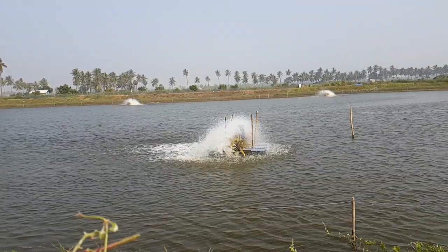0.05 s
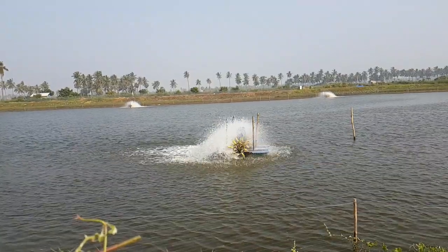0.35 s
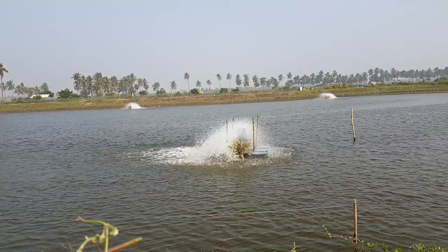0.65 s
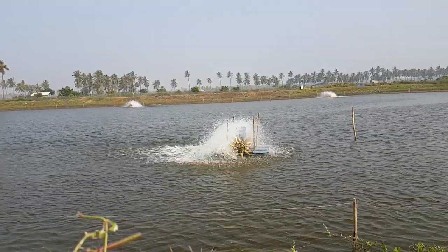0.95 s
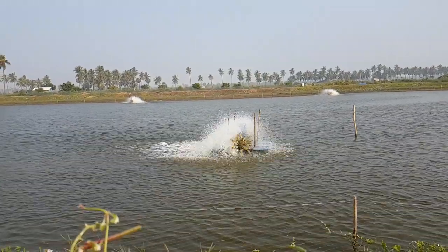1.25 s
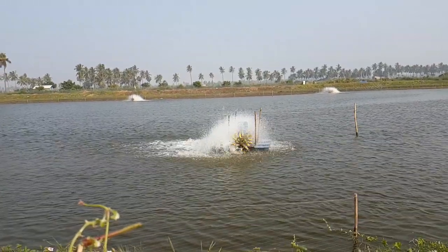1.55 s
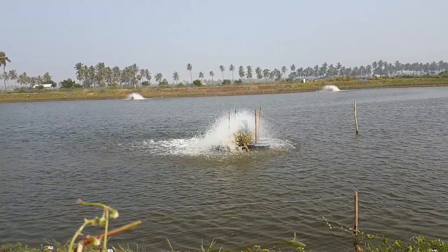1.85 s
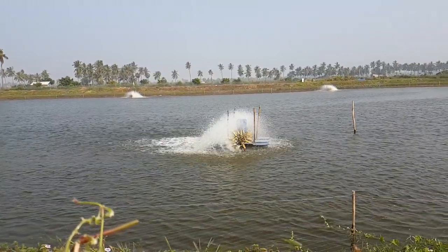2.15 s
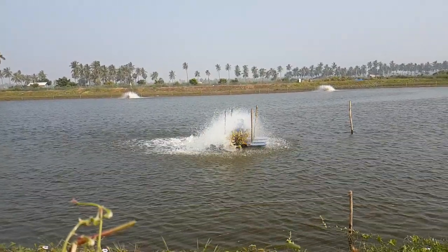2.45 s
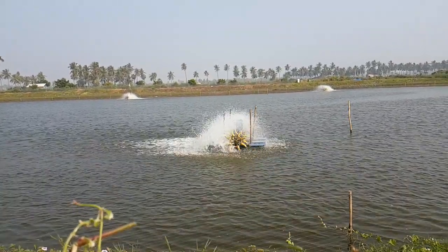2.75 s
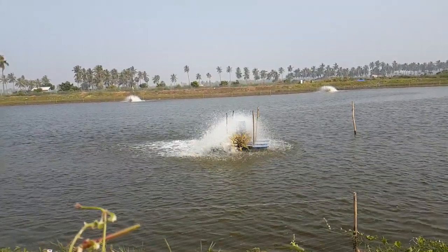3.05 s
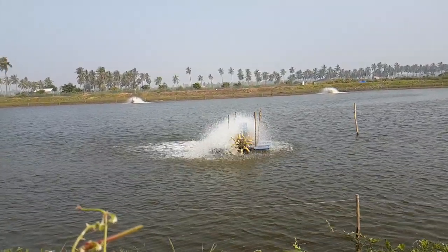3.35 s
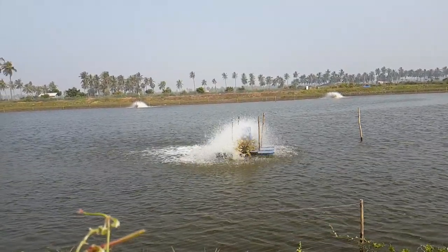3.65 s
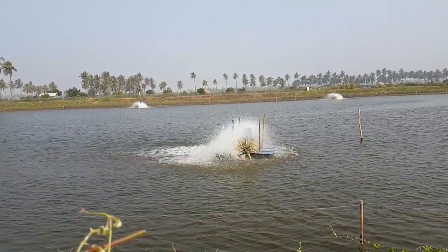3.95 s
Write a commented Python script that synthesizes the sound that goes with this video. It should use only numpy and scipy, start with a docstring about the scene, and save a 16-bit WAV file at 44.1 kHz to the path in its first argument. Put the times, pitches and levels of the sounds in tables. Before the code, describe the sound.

Steady splashing from a paddlewheel carries across an open pond, with light bubbling underneath. Gusts flutter on the microphone throughout, stronger on the right, with a few sharp air pops and then a run of low thumps.

```python
"""A paddlewheel aerator churns a pond some way off, heard from the bank through a stereo microphone.
From the start its spray falls back as a sloshing rush over small bubbles, coloured by close
reflections, while gusts rumble and flutter on the two ports, harder on the right. Half a second in,
a cluster of bubbles plinks. Air pops on a port just after that, and twice more around 1.8 s.
From 3.2 s a run of buffets thumps mostly on the right, and the rush carries on underneath."""
import sys
import numpy as np
from scipy import signal
from scipy.fft import rfft, irfft
from scipy.io import wavfile
from scipy.ndimage import uniform_filter1d

SR = 44100
rng = np.random.default_rng(int(sys.argv[2]) if len(sys.argv) > 2 else 0)


def transcribe(u):
    """Save the signal u as a 16-bit wav file named by the first command-line argument.

    u: samples, shape (n,) or (channels, n), limited to [-1, 1]; the rate is SR.
    q: integer samples, one column per channel.
    """
    v = np.clip(np.atleast_2d(u).T, -1, 1)
    q = np.round(v * 32767).astype(np.int16)
    wavfile.write(sys.argv[1], SR, q)


N = 176400
T = np.arange(N) / SR
SIZE, HOP = 1024, 128
HZ = np.fft.rfftfreq(SIZE, 1 / SR)
FRAME_S = np.arange(N // HOP + 9)[:, None] * HOP / SR

# The rise and fall of the wind. Each row: time in seconds, strength in dB.
GUST_ENVELOPE = [(0, -35.5), (.055, -26), (.08, -38), (.15, -36.5), (.26, -29.5), (.33, -34.5),
                 (.81, -34.5), (1.11, -37.5), (1.2, -40), (1.43, -32.5), (1.55, -37), (1.64, -33.5),
                 (1.81, -33.5), (1.92, -42.5), (2.08, -35), (2.14, -41), (2.26, -28.5), (2.35, -42),
                 (2.61, -32), (2.66, -42.5), (2.82, -38.5), (2.93, -36.5), (3.09, -37), (3.27, -29.5),
                 (3.39, -35), (3.56, -29), (3.63, -40.5), (3.67, -32), (3.79, -35.5), (3.92, -32.5),
                 (4, -40)]
# Tone of light air and of a buffet on a port. Each row: frequency in Hz, relative level in dB.
RUMBLE_EQ = [(20, -30), (40, -34), (65, -1.5), (120, 4), (200, -2), (330, -1.5), (480, -8.5), (700, -15.5),
             (1200, -28), (3000, -69)]
BUFFET_EQ = [(20, -41), (60, -17), (130, -6), (250, 0), (380, 2.5), (520, -5.5), (750, -14.5),
             (1200, -24.5), (3000, -57)]
# Extra body in the right port's rumble. Each row: frequency in Hz, boost over the left in dB.
RIGHT_RUMBLE_EQ = [(60, 1.5), (150, 2), (350, 6.5), (800, 3.5)]
# Wind hits. Each row: peak time and length in seconds, centre in Hz, left and right level in dB.
BUFFET_HITS = [(.044, 0.016, 320, -24, -22), (.271, 0.023, 353, -21.5, -20),
               (.573, 0.0088, 330, -42, -24.5), (.673, .022, 700, -49, -30), (0.77, .008, 390, -28, -29),
               (.8, 0.013, 340, -26, -22.5), (.826, 0.012, 350, -26.5, -23), (.908, 0.015, 350, -33.5, -30),
               (1.042, 0.013, 330, -42, -25.5), (1.24, 0.012, 340, -29, -27), (1.332, 0.029, 460, -31, -30),
               (1.394, 0.034, 690, -41, -31), (1.518, 0.0044, 390, -21, -26), (1.671, .034, 320, -40, -27),
               (1.73, 0.021, 366, -32, -23), (1.798, 0.02, 460, -21.5, -26), (1.822, .013, 400, -22, -23.5),
               (2.098, 0.016, 350, -32.5, -22.5), (2.428, 0.039, 400, -29, -26.5),
               (2.479, 0.032, 380, -23, -24), (2.586, 0.021, 380, -24, -36),
               (2.757, 0.0059, 680, -40, -29.5), (2.91, .014, 250, -31, -29.5),
               (3.185, 0.0084, 400, -23, -19), (3.219, 0.0091, 382, -34, -19.5),
               (3.253, 0.027, 384, -27.5, -18), (3.346, 0.012, 316, -31, -19),
               (3.371, 0.012, 298, -31, -22), (3.43, .008, 350, -25.5, -24.5), (3.514, .025, 390, -28, -26),
               (3.595, .013, 330, -27.5, -22), (3.692, .01, 520, -36, -28), (3.71, 0.0094, 340, -33, -19.5),
               (3.897, 0.016, 300, -30.5, -27)]
# Sharp pops of air. Each row: time in seconds, port (0 left, 1 right), peak in dB.
AIR_POPS = [(.572, 1, -19), (1.792, 0, -11), (1.824, 1, -16)]
# Reflections off surfaces close to each port. Each row: delay in milliseconds, linear gain.
REFLECTIONS_LEFT = [(.347, .27), (.528, -.22), (2.222, .14)]
REFLECTIONS_RIGHT = [(.197, .68), (.829, -.2), (1.22, -.38), (1.594, .22), (1.758, -.46), (1.93, .22),
                     (2.463, -.31), (2.979, -.44), (3.102, -.17), (3.386, -.16), (3.678, .19)]
# Scattered sound that widens the spray. Each row: frequency in Hz, level over the direct sound in dB.
SCATTER_EQ = [(400, 13), (950, 2), (1500, -10.5), (2600, 2), (4500, 2), (7000, 1), (8500, 13)]
# Tone of the spray at each port. Each row: frequency in Hz, relative level in dB.
SPRAY_EQ_LEFT = [(30, -28), (120, -4.5), (400, -2.5), (780, -5), (1080, 3), (1220, 0), (1430, 3),
                 (1620, 3.5), (2400, -4.5), (2780, -5.5), (3300, -3.5), (3850, -6), (4500, -6),
                 (6100, -9.5), (6700, -12.5), (7900, -27), (8800, -29), (9700, -29.5), (11200, -21),
                 (12200, -26.5), (13000, -25.5), (15600, -25.5)]
SPRAY_EQ_RIGHT = [(30, -30), (120, -2.5), (400, -6.5), (780, 0.5), (1000, 1), (1500, .5), (2600, -3),
                  (4500, -8), (5800, -14), (6800, -23), (7400, -26), (8000, -38), (9400, -29.5),
                  (10300, -26), (12200, -26), (13600, -24.5), (15600, -25.5)]


def amp(db):
    """Decibels to gain."""
    return 10 ** (np.asarray(db) / 20)


def unit(x):
    """Scales to rms 1."""
    return x / np.sqrt(np.mean(x ** 2) + 1e-20)


def levelled(x, size):
    """Rides the gain to hold the rms at 1 over stretches of `size` samples."""
    return unit(x) / np.sqrt(uniform_filter1d(unit(x) ** 2, size=size) + 1e-6)


def eq_db(curve, hz):
    """Reads an EQ curve on a log-frequency axis."""
    knots_hz, db = np.transpose(curve)
    return np.interp(np.log(hz + 1), np.log(np.sort(knots_hz) + 1), db)


def drift(span_s, width_hz=None):
    """Smooth random modulation over time, rms 1; given a width, it also varies across frequency."""
    field = rng.standard_normal((len(FRAME_S), len(HZ) if width_hz else 1))
    rate_hz = np.fft.rfftfreq(len(field), HOP / SR)[:, None]
    field = irfft(rfft(field, axis=0) * np.exp(-(rate_hz * span_s) ** 2), len(field), axis=0)
    if width_hz:
        ripples_per_hz = np.fft.rfftfreq(len(HZ), HZ[1])
        field = irfft(rfft(field) * np.exp(-(ripples_per_hz * width_hz) ** 2), len(HZ))
    return unit(field)


def noise_frames():
    """White noise as short-time spectra."""
    shape = len(FRAME_S), len(HZ)
    return rng.standard_normal(shape) + 1j * rng.standard_normal(shape)


def render(spectra):
    """Short-time spectra to samples."""
    return signal.istft(spectra.T, nperseg=SIZE, noverlap=SIZE - HOP)[1][:N]


def per_sample(curve):
    """A frame curve at the sample rate."""
    return np.interp(T, FRAME_S[:, 0], curve[:, 0])


def wind(port, eddy_db=2.5, flutter_db=1.9, trim_db=0.1):
    """The rumble bed: eddies tumble over one port, and stronger air is louder and brighter."""
    strength = np.interp(FRAME_S, *np.transpose(GUST_ENVELOPE))
    octaves = np.log2(np.clip(HZ, 50, 800) / 200)
    tilt = 0.12 * (strength - strength.mean()) * octaves
    left_colour = eq_db(RUMBLE_EQ, HZ)
    colour = left_colour + port * eq_db(RIGHT_RUMBLE_EQ, HZ)
    port_gain = np.linalg.norm(amp(colour)) / np.linalg.norm(amp(left_colour))
    eddies = render(noise_frames() * amp(colour + tilt + eddy_db * drift(span_s=0.046, width_hz=330)))
    flutter = amp(flutter_db * per_sample(drift(span_s=0.009)))
    return port_gain * levelled(eddies * flutter, size=2600) * amp(per_sample(strength) + trim_db)


def buffets(port, size=8192, eq_centre_hz=380):
    """Single eddies hit one port: large ones thump, small fast ones whoosh higher."""
    out, hz = np.zeros(N), np.fft.rfftfreq(size, 1 / SR)
    for peak_s, length_s, centre_hz, *port_db in BUFFET_HITS:
        colour = eq_db(BUFFET_EQ, hz * eq_centre_hz / centre_hz)  # slid to this hit's centre
        air = irfft(rfft(rng.standard_normal(size)) * amp(colour))
        at = np.arange(size) + round(peak_s * SR) - size // 2
        swell = np.exp(-2 * ((at / SR - peak_s) / length_s) ** 2)
        hit = amp(port_db[port]) * swell * levelled(air, size=500)
        inside = (at >= 0) & (at < N)
        out[at[inside]] += hit[inside]
    return out


def pops(width_s=0.00048):
    """A small eddy hits a port: one quick swing of pressure."""
    out = np.zeros((2, N))
    for peak_s, port, db in AIR_POPS:
        offset = (T - peak_s) / width_s
        out[int(port)] += amp(db) * (1 - offset ** 2) * np.exp(-offset ** 2 / 2)
    return out


def water_path(port, hz, right_lag_ms=0.017):
    """Comb filtering at one port: the direct sound of the water plus its close reflections."""
    phase_per_ms = -2j * np.pi * hz / 1000
    taps = (REFLECTIONS_LEFT, REFLECTIONS_RIGHT)[port]
    reflections = sum(gain * np.exp(phase_per_ms * ms) for ms, gain in taps)
    return np.exp(phase_per_ms * port * right_lag_ms) * (1 + reflections)


def from_water(x):
    """Carries a sound from the aerator to both ports."""
    paths = [water_path(port, np.fft.rfftfreq(N, 1 / SR)) for port in range(2)]
    return np.array([irfft(rfft(x) * path / np.sqrt(np.mean(abs(path) ** 2)), N) for path in paths])


def bubbles(per_s=210, low_hz=846, high_hz=4220, pitches=28, cycles=5.3, spread_db=3.5, level_db=-54):
    """Tucked under the spray: larger drops trap bubbles that ring briefly, rising in pitch."""
    out = np.zeros(N)
    for hz in np.geomspace(low_hz, high_hz, pitches):
        t = np.arange(0, cycles / hz, 1 / SR)
        age = t * hz / cycles
        chirp = np.sin(2 * np.pi * hz * t * (1 + 0.1 * age))
        envelope = np.exp(-3 * age) * (1 - age) * np.minimum(age * 10, 1)
        drops = rng.random(N) < per_s / pitches / SR
        accents = amp(spread_db * np.minimum(rng.exponential(1, N), 4))
        out += signal.oaconvolve(drops * accents, chirp * envelope)[:N]
    return amp(level_db) * unit(out)


def plink(peak_s=0.507, length_s=0.017, centre_hz=2080, width_hz=150, level_db=-36.5):
    """One bright accent: a cluster of small bubbles rings out of the rush."""
    band = np.exp(-0.5 * ((HZ - centre_hz) / width_hz) ** 2)
    ring = levelled(render(noise_frames() * band), size=900)
    swell = np.exp(-2 * ((T - peak_s) / length_s) ** 2)
    return amp(level_db) * ring * swell


def spray(port_db=(-37, -36.5), slosh_hz=1200, slosh_octaves=0.47, paddles_per_s=7.1):
    """The main rush: countless drops fall back, and the mids slosh as the paddles dig in."""
    slosh_band = np.exp(-0.5 * (np.log2((HZ + 1) / slosh_hz) / slosh_octaves) ** 2)
    slosh_db = 2.13 * slosh_band * drift(span_s=0.0071)
    shimmer_db = 0.8 * drift(span_s=0.018, width_hz=1400)
    flicker_db = 0.38 * drift(span_s=0.011)
    paddle_db = 0.25 * np.sin(2 * np.pi * paddles_per_s * FRAME_S)
    fade_db = -0.18 * (FRAME_S - FRAME_S.mean())
    direct, scatter_gain = noise_frames(), amp(eq_db(SCATTER_EQ, HZ))
    ports = []
    for port, tone in enumerate((SPRAY_EQ_LEFT, SPRAY_EQ_RIGHT)):
        path = water_path(port, HZ)
        blend = path * direct + scatter_gain * noise_frames()  # each port gets its own scatter
        blend /= np.sqrt(np.mean(abs(path) ** 2) + scatter_gain ** 2)
        rush = render(blend * amp(eq_db(tone, HZ) + slosh_db + shimmer_db))
        ports.append(amp(port_db[port]) * unit(rush))
    return np.array(ports) * amp(per_sample(flicker_db + paddle_db + fade_db))


def scene():
    """The mix: the aerator across the water, with wind on each port."""
    aerator = spray() + from_water(bubbles() + plink())
    air = np.array([wind(port) + buffets(port) for port in range(2)]) + pops()
    return aerator + air


def record(dry):
    """A steep low-pass takes off the very top."""
    lowpass = signal.firwin(801, cutoff=15750, window=("kaiser", 9), fs=SR)
    return signal.oaconvolve(dry, lowpass[None], "same")


dry = scene()
out = record(dry)
transcribe(out)
```